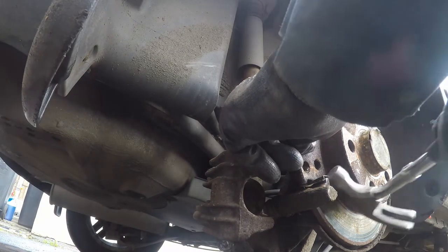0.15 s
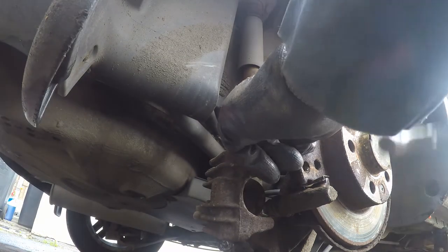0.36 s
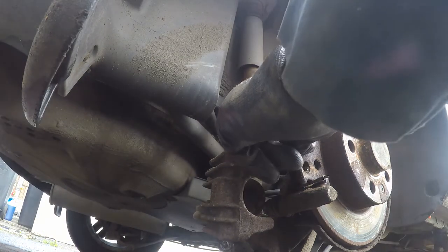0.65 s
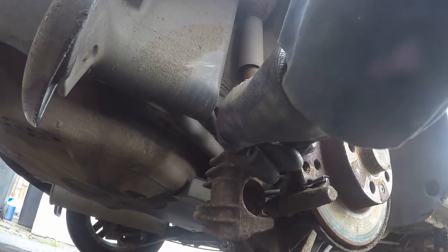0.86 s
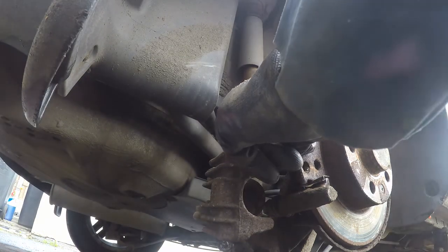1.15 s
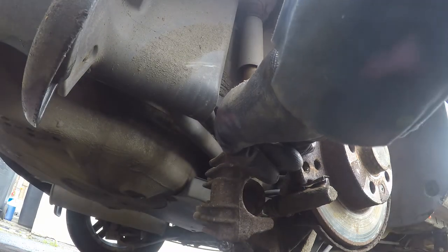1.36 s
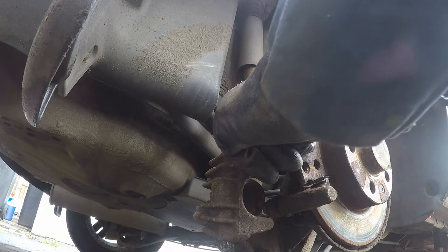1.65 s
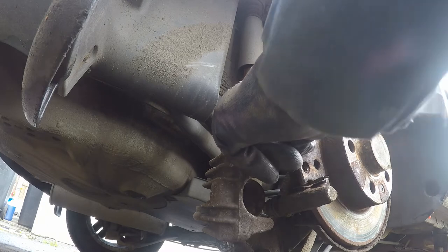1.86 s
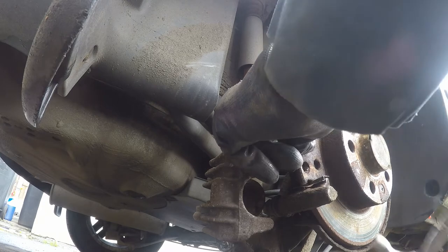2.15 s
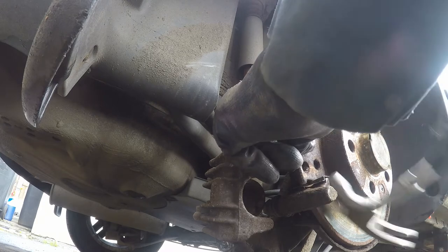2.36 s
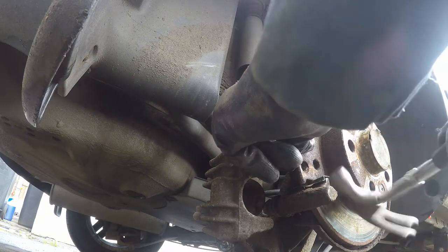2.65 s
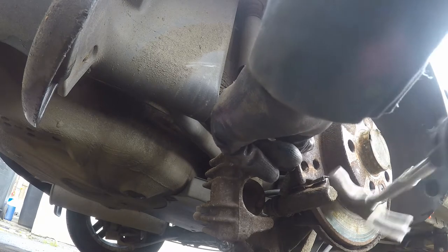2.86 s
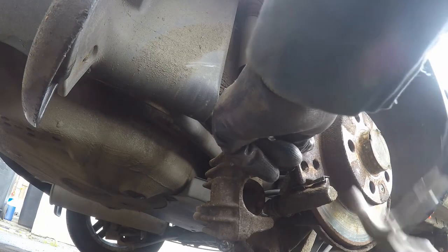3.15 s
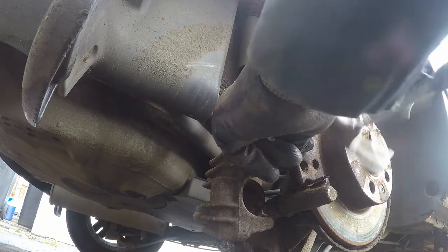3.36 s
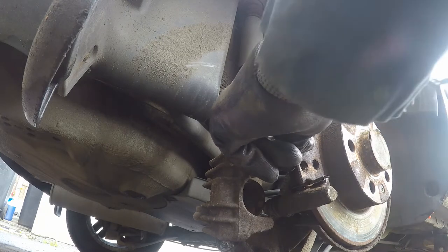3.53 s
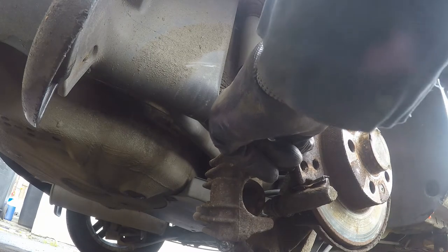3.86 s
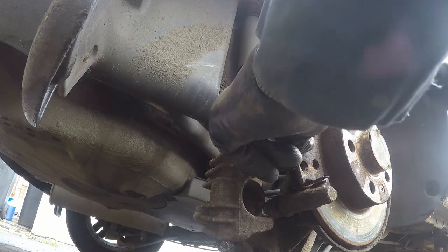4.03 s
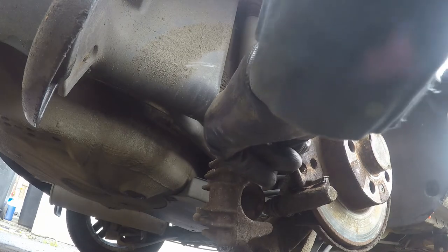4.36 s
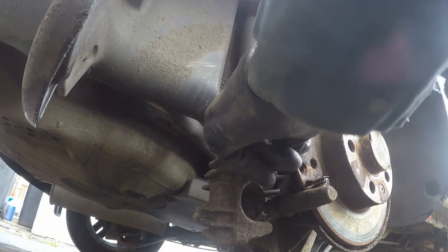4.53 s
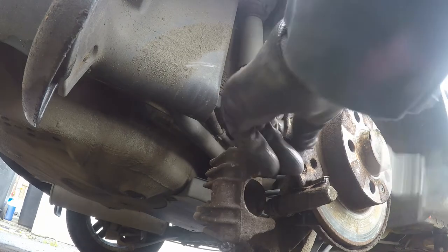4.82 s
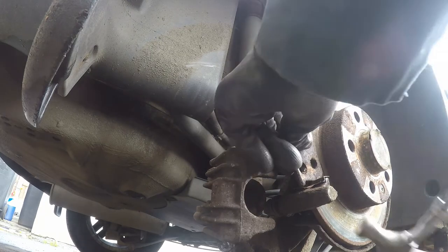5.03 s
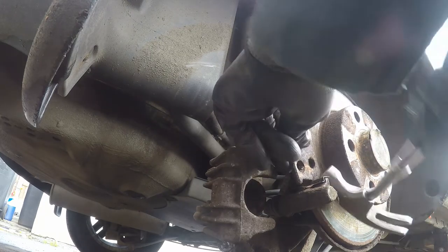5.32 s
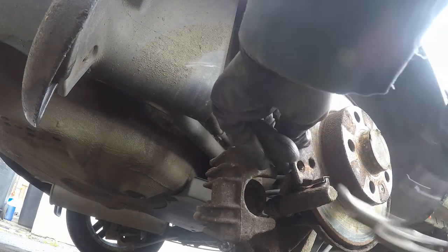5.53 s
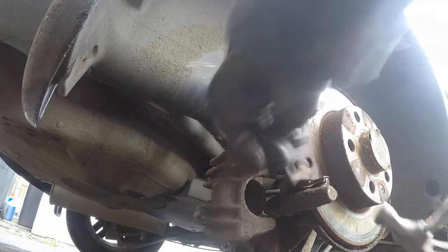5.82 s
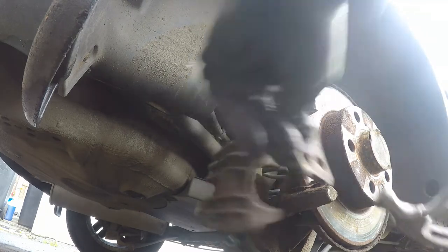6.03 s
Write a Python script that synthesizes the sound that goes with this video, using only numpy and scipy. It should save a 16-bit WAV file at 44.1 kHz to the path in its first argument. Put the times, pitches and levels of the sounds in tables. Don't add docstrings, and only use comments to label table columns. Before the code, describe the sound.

Sharp metallic knocks and short bright rings under a car, with boomy body thuds, small tinkles, low engine hum and swelling road noise.

```python
import sys
import numpy as np
from scipy import signal
from scipy.fft import rfft, irfft
from scipy.io import wavfile
from scipy.ndimage import uniform_filter1d

SR = 44100
rng = np.random.default_rng(int(sys.argv[2]) if len(sys.argv) > 2 else 0)


def gain_from_db(level_db):
    decades = np.asarray(level_db, float) / 20
    return 10 ** decades


def store_wav(level_fs):
    pcm = np.round(np.clip(np.atleast_2d(level_fs), -1, 1) * 32767)
    wavfile.write(sys.argv[1], SR, pcm.T.astype(np.int16))


N = 272979

# frequency [Hz], level [dB].
CASTING_COLOUR = [(240, -42), (450, -14), (570, -20.5), (720, -4), (1480, -1.5), (1880, -10), (2190, -3),
                  (2510, -12), (3050, 3.5), (3720, -7), (4330, -8.5), (5860, -20.5), (8690, -31),
                  (15000, -52.5)]
# level in its family [dB], t60 [s].
DISC_MODES = [(0, .21), (-18, .16), (1, .1), (-17, .25), (2, .125), (-19, .32), (-1, .15), (-28, .4),
              (-2, .16), (-23, .36), (-12, .16)]
DISC_MODE_HZ = [2099, 2540, 3035, 3050, 4281, 4287, 5782, 5789, 7520, 7528, 9473]
MODE_FAMILY = [0, 1, 1, 1, 2, 2, 3, 3, 4, 4, 4]


def evened(x):
    return x / np.sqrt(np.mean(x ** 2) + 1e-20)


def read(points, hz):
    f, value = np.transpose(points)
    return np.interp(np.log(hz + 1), np.log(f + 1), value)


def add(mix, s, sound):
    part = mix[round(s * SR):][:len(sound)]
    part += sound[:len(part)]


def rings(hz, t60, t):
    decay = gain_from_db(-60 * t / np.maximum(t60, .005)[:, None])
    return decay * np.exp(2j * np.pi * hz[:, None] * t)


def blows():
    # start [s], clank [dB],
    # tick re clank [dB], weight below 2 kHz re clank [dB].
    raps = [(0.0854, 4, -7, -21), (0.985, -2, -25, -21.5), (0.9998, -1.5, -19.5, -20.5),
            (1.004, -0.5, -15.5, -20.5), (1.0174, -20, -45, -21), (1.2788, -1, -26.5, -17),
            (1.2823, 4.5, -14.5, -23), (1.5473, -4, -21.5, -15), (1.5561, 2, -6, -14.5),
            (2.2963, 0.5, -38, -10.5), (2.3053, -4, -15, -4), (2.3262, 4, -8.5, -19.5),
            (2.58, -0.5, -17.5, -23), (2.5966, 6, -8.5, -13.5), (2.8268, -2, -18, -21),
            (2.8326, 0, -5.5, -10.5), (3.0411, 1, -19, -25), (3.0472, 1.5, -3.5, -13),
            (3.2696, 0.5, -19, -26.5), (3.2874, -6.5, -14.5, -14.5), (3.9912, 9.5, -12.5, -12.5),
            (4.282, 2, -14.5, -16), (5.2908, 2, -35, -18.5), (5.3062, -9, 12.5, 21),
            (5.5923, 2, -10, -16.5), (5.617, -5, -18, -18), (5.6226, -9, -4, -17), (5.628, -12.5, -18, -14),
            (.1945, -32, -33, -3), (2.6892, -19, -17, -18.5), (2.9153, -17, -24, -23),
                (2.9258, -16, -24, -13), (3.1329, -18, -19, -19), (3.1474, -26.5, -15, -9),
                (3.3154, -16.5, -6, -43), (3.3353, -19, 3, -16), (3.367, -26, -31, -16),
                (4.012, -11.5, -40, -15.5), (4.29, -14, -25, -13), (5.3009, -5, -2, 12),
                (5.4537, -39, -3, -26), (5.471, -39, -14, -22), (6.077, -28, -2, -22),
                (5.8653, -11.5, -27, -13.5), (5.9228, -16, -19, -13), (5.943, -12, -9, -16)]
    # start [s], clank [dB], tick re
    # clank [dB], weight below 2 kHz re clank [dB].
    further_contacts = [(.2, -35, -23, -9), (1.0105, -9, -27.5, -17.5), (2.3185, -30, -3, -25), (2.604, -10, -30, -10),
                        (2.701, -39, -32, 0), (3.276, -7, -24.5, -21), (3.99, -8, -28, -18), (4.2805, -15, -24, -27),
                        (5.79, -39, -15.5, -25), (5.893, -12.5, -24, -12), (5.9157, -18, -30, -10),
                        (5.932, -24, -11, -23), (5.967, -33, -35, 2), (5.8608, -24, -16, -25), (2.056, -46, -28, -8),
                        (3.428, -46, -25, -14)]
    # frequency [Hz], t60 [s].
    casting_t60 = [(400, 0.13), (800, 0.079), (1500, 0.055), (2300, 0.056), (3050, 0.028), (4500, 0.028),
                   (8000, 0.019), (15000, 0.028)]
    mode_count = 420
    t = np.arange(SR // 7) / SR
    dense_hz = (21 + 104 * (np.arange(mode_count) + rng.random(mode_count)) / mode_count) ** 2
    t60_s = read(casting_t60, dense_hz) * np.exp(0.07 * rng.standard_normal(mode_count))
    casting = rings(dense_hz, t60_s, t)
    colour_db = read(CASTING_COLOUR, dense_hz) + 5 * np.log10(dense_hz / 3000)
    bright = np.clip(np.log2(dense_hz / 4000), 0, 1)
    dull = np.clip(np.log2(2300 / dense_hz) * 2, 0, 1)
    attack = 1 - np.exp(-t / 0.00065)
    fade = np.cos(np.pi / 2 * t / t[-1])
    contacts = sorted(raps) + further_contacts
    luck = rng.standard_normal((len(contacts), 2, 430))
    out = np.zeros(N)
    for (s, db, tick_db, weight_db), (a, b) in zip(contacts, luck):
        length = np.clip(1.12 - 0.35 * db - 0.14 * (weight_db + 11.5), .4, 1.6)
        spot = (a + 1j * b)[:mode_count]
        spot = spot / np.sqrt(1 + 0.85 * abs(spot) ** 2)
        mode_db = colour_db + bright * (tick_db + 24.0) + dull * (weight_db + 14.5)
        clank = (gain_from_db(mode_db) * spot @ casting).real
        clank *= attack * fade * gain_from_db(-900 * t * (1 / length - 1))
        add(out, s + 0.00042, gain_from_db(db - 1.0) * clank / abs(clank).max())
        tick = uniform_filter1d(np.diff(a), size=2) * np.exp(-t[:429] / 0.00021)
        add(out, s + 0.00043, gain_from_db(db + tick_db - 12.0) * tick)
    return out


def disc():
    # start [s], rim, hat and face modes [dB], hardness [dB].
    contacts = [(.0857, -30, -25, -31, -8.5), (0.987, -31, -29, -41, -5), (1.0005, -46, -24, -42, -4),
                (1.2815, -42, -16.5, -35, 3.5), (1.548, -18, -27.5, -23.5, -2.5),
                (1.557, -20.5, -20.5, -17.5, -2), (2.2972, -32, -24, -11.5, -13.5),
                (2.327, -42, -9.5, -27, -4), (2.5799, -20, -35, -9.5, -9), (2.596, -33, -24, -24, 5),
                (2.687, -55, -53, -42, -4), (2.8332, -48, -44, -15.5, -7), (2.916, -45, -48, -44, 8),
                (3.0468, -45, -37, -22, 3), (3.2711, -25, -9, -26, -2), (3.991, -17, -16, -20, -1.5),
                (4.0115, -51, -22, -41.5, -2), (4.2818, -20.5, -16, -30, 1),
                (5.2909, -23, -13.5, -19.5, -9), (5.5935, -19.5, -15, -9, -13),
                (5.6232, -18.5, -20.5, -23, -11), (5.757, -55, -57, -47.5, -7), (5.871, -49, -36, -37, -12),
                (5.909, -46, -33, -43, 3), (5.933, -36, -38, -44, -11)]
    # contact [s], extra damping [dB/s], below zero it lifts clear.
    grips = [(.0857, 60), (1.0005, -52), (1.2828, 49), (1.5567, 16), (2.3274, 29), (2.5799, 150),
             (2.596, 63), (2.688, 100), (2.8332, 500), (2.916, 498), (3.0473, 300), (3.2699, 44.5),
             (4.0127, 29.5), (4.2824, 33), (5.2908, -20), (5.6232, -23), (5.757, -100), (5.87, -380),
             (5.909, -50), (5.933, -200)]
    # contact [s], hat pair [s], face pair [s].
    pair_nulls = [(.0857, .06, .075), (1.5567, .045, .078), (2.3274, .055, .048), (4.2824, .062, .024),
                  (5.2908, .06, .062), (5.6232, .05, .09)]
    # contact [s], extra level [dB].
    edge_hits = [(1.2828, 12), (2.596, 4), (4.0127, 16), (4.2824, -3.5), (2.3274, 6), (3.9912, 0),
                 (3.2699, -6)]
    face_overtone_db, rim_overtone_db, null_depth = 0, -8.5, .95
    t, out = np.arange(SR // 2) / SR, np.zeros(N)
    db, t60 = np.transpose(DISC_MODES)
    modes = rings(np.array(DISC_MODE_HZ), t60, t)
    family_turn = rng.random((len(contacts), 5))[:, MODE_FAMILY]
    mode_turn = .08 * rng.random((len(contacts), len(DISC_MODES)))
    phases = np.exp(2j * np.pi * (family_turn + mode_turn))
    following = contacts[1:] + [(N / SR + 1,)]
    for (s, rim_db, hat_db, face_db, hard_db), after, phase in zip(contacts, following, phases):
        family_db = [rim_db, hat_db, face_db,
                     face_db + face_overtone_db + hard_db, rim_db + rim_overtone_db + hard_db]
        family_db[-1] += sum(extra_db for at, extra_db in edge_hits if abs(at - s) < .006)
        grip = sum(loss for at, loss in grips if abs(at - s) < .006)
        choke = uniform_filter1d(np.where(t > after[0] - s, gain_from_db(-26), 1), 60)
        choke = choke * (1 - np.exp(-t / 0.00017))
        strength = gain_from_db(db + np.array(family_db)[MODE_FAMILY]) * phase
        for at, *nulls in pair_nulls:
            if abs(at - s) >= .006:
                continue
            for main, null_s in zip((2, 4), nulls):
                k = round(null_s * SR)
                strength[main + 1] = -null_depth * strength[main] * modes[main, k] / modes[main + 1, k]
        add(out, s, (strength @ modes).imag * choke * gain_from_db(-grip * np.minimum(t, .12)))
    return out


def tinkles():
    # start [s], peak [dB], frequency [Hz], t60 [s].
    small_parts = [(3.274, -21, 7500, 0.057), (3.3165, -26, 11900, 0.027), (3.337, -32, 11300, 0.022),
                   (3.3685, -29, 4800, 0.015), (3.995, -30, 11620, 0.043), (4.285, -34.5, 11500, .063),
                   (5.307, -15, 10340, 0.02), (5.307, -26, 7830, 0.03), (5.308, -11, 11400, 0.012),
                   (5.393, -54, 11200, .025), (5.454, -46, 7600, 0.034), (5.47, -33, 4630, 0.013),
                   (5.756, -54, 9290, .03), (5.781, -51, 9000, 0.027), (5.876, -35, 10940, .02),
                   (5.889, -34, 12000, 0.017), (5.896, -27, 12100, 0.014), (5.944, -13, 8800, 0.0063),
                   (6.077, -34, 4830, 0.019), (6.078, -28, 7900, 0.026)]
    # start [s], peak
    # [dB], frequency [Hz], t60 [s].
    clangs = [(0.091, -21, 2500, 0.12), (.09, -27.5, 2190, 0.18), (.0865, -13, 4320, .028),
              (2.6888, -35, 3230, .02), (2.688, -33, 4500, .02), (2.917, -23, 3250, 0.027),
              (2.836, -34, 2540, 0.25), (3.1346, -33.5, 3300, .025), (0.997, -17, 140, 0.049),
              (1.0, -24, 358, 0.19), (1.28, -17, 143, 0.1), (1.285, -32, 358, 0.14),
              (2.298, -7.5, 3124, 0.034), (2.327, -6, 1497, 0.034), (3.99, -14.5, 205, .12),
              (5.943, -21, 7600, 0.014), (5.966, -25, 950, .02), (0.0907, -15, 1580, 0.049),
              (1.003, -4.5, 2150, 0.04), (1.005, -16.5, 5730, 0.043), (1.56, -8, 2180, 0.052),
              (2.308, -10, 3080, 0.023), (2.327, -27, 7550, 0.076), (2.836, -12.5, 1527, 0.067),
              (3.2691, -4, 4830, 0.019), (3.993, -5, 2255, 0.041), (4.012, -16.5, 2980, 0.024),
              (4.2819, -4.5, 3036, 0.084), (4.287, -10, 790, 0.055), (5.2896, -1.5, 3040, 0.028),
              (5.298, -20, 920, 0.044), (5.315, -10.5, 806, 0.049), (5.595, -2, 3035, 0.045),
              (5.867, -21.5, 1440, 0.073), (5.8665, -17.5, 3220, 0.037), (5.932, -28.5, 3047, 0.17),
              (5.943, -15.5, 4080, 0.034), (6.092, -19.5, 250, 0.096)]
    # start [s], peak [dB].
    pin = [(.195, -67), (2.33, -43), (2.715, -64), (2.93, -62), (3.15, -69), (3.3685, -55), (5.454, -56)]
    pin_hz, pin_t60_s = 12800, 0.05
    t, out = np.arange(SR // 8) / SR, np.zeros(N)
    parts = small_parts + clangs + [(s, db, pin_hz, pin_t60_s) for s, db in pin]
    luck = rng.standard_normal((len(parts), 400))
    for (s, db, hz, t60), grit in zip(parts, luck):
        spread_hz = 0.53 / t60 * np.array([0, 3, -4]) * (1 + 0.83 * grit[:3])
        cluster = rings(hz + spread_hz, t60 * np.array([1, .6, .6]), t)
        note = (np.array([1, .55, .55]) @ cluster).imag * (1 - np.exp(-t / 0.0017))
        add(out, s, gain_from_db(db) * note)
        tick = uniform_filter1d(np.diff(grit), 3) * np.exp(-t[:399] / 0.0023)
        add(out, s, gain_from_db(db - 17.0) * tick)
    return out


def drag():
    # time [s], pressure [dB].
    strokes = [
        [(5.75, -74), (5.76, -63), (5.795, -48), (5.81, -58)],
        [(5.857, -41), (5.868, -27), (5.9, -35), (5.925, -42), (5.953, -59)],
    ]
    t, pressure = np.arange(N) / SR, np.zeros(N)
    for stroke in strokes:
        s, db = np.transpose(stroke)
        pressure += gain_from_db(np.interp(t, s, db, -200, -200))
    size = gain_from_db(3.5 * np.minimum(rng.exponential(1, N), 3))
    slips = pressure * size * rng.choice([-1, 1], N) * (rng.random(N) < 700 / SR)
    db, t60 = np.transpose(DISC_MODES)
    mode_db = db + np.array([-16, -4, 1, -22, -6])[MODE_FAMILY]
    ring = (gain_from_db(mode_db) @ rings(np.array(DISC_MODE_HZ), 0.59 * t60, t[:8000])).imag
    hz = np.fft.rfftfreq(2048, 1 / SR)
    burst = rng.standard_normal(2048) * np.exp(-t[:2048] / 0.0035)
    grit = irfft(rfft(burst) * gain_from_db(0.41 * read(CASTING_COLOUR, hz)))
    ringing = signal.oaconvolve(slips, gain_from_db(-20) * ring)[:N]
    clanking = signal.oaconvolve(slips, grit / abs(grit).max())[:N]
    return ringing + clanking * gain_from_db(-7.0)


def arch(x):
    # frequency [Hz], t60 [s].
    echo_t60 = [(200, 0.51), (1000, 0.11), (4000, 0.094), (14000, 0.09)]
    taps = np.zeros(SR // 2)
    at = np.arange(80, SR // 2 - 20, 20)
    taps[at + rng.integers(0, 20, len(at))] = rng.choice([-1., 1.], len(at))
    hz, t, z = signal.stft(taps, SR, nperseg=128)
    tail = signal.istft(z * gain_from_db(-60 * t / read(echo_t60, hz)[:, None]), SR, nperseg=128)[1]
    return signal.fftconvolve(x, tail / np.linalg.norm(tail))[:N]


def body():
    # start [s], floor pan [dB], near panel [dB], frame [dB].
    shoves = [(0.0844, -17, -8.5, -18.5), (.742, -24.5, -19.5, -29), (.983, -23, -19, -14),
              (.996, -8.5, -8.5, -4), (1.277, -6.5, -6, -2), (1.553, -13, -5.5, -8.5),
              (2.296, -18, -4.5, -13), (2.3248, -25, -7.5, -8), (2.586, -12.5, -6.5, -14.5),
              (2.83, -20, -6, -14.5), (3.043, -20, -6.5, -25), (3.274, -11.5, -13, -12),
              (3.986, -8.5, -5, -9), (4.2825, -15, -12, -6.5), (5.291, -27, -9, -18.5),
              (5.591, -17, -6.5, -17), (5.867, -14.5, -32, -33), (6.087, -31, -16, -12.5)]
    mode_hz = [110, 143, 194, 238, 358]
    mode_t60 = [0.26, 0.19, 0.22, 0.24, 0.26]
    frame_usual_db, frame_follows = [-18, -23, -26], [0.72, 0.28, 0.66]
    thud_db, thud_t60_s = -22.5, 0.14
    t, out = np.arange(SR // 3) / SR, np.zeros(N)
    rise = (1 - np.exp(-t / 0.0099)) ** 2
    modes = rings(np.array(mode_hz), np.array(mode_t60), t).imag * rise
    small = rings(np.geomspace(90, 480, 24), np.full(24, thud_t60_s), t) * rise
    luck = rng.standard_normal((len(shoves), 2, 24))
    for (s, pan_db, panel_db, frame_db), (a, b) in zip(shoves, luck):
        bent_db = frame_usual_db + (frame_db - frame_usual_db[0]) * np.array(frame_follows)
        mode_db = np.array([pan_db, panel_db, *bent_db])
        boom = gain_from_db(mode_db - 2.0) @ modes
        thud = gain_from_db(thud_db + np.mean(mode_db) + 9.5) * ((a + 1j * b) @ small).real
        add(out, s, boom + thud)
    return out


def rustle():
    # start [s], length [s], level [dB].
    strokes = [(0.268, 0.14, -60), (0.42, 0.29, -57), (0.61, 0.26, -64), (1.767, 0.14, -57.5),
               (3.55, 0.2, -59), (4.537, 0.49, -56.5), (5.727, 0.075, -56)]
    # frequency [Hz], level [dB].
    cloth = [(800, -6), (2500, 6), (3500, 6), (7000, -6.5), (12000, -13.5), (15500, -21.5)]
    stroke = np.full(N, gain_from_db(-66))
    for s, length, db in strokes:
        add(stroke, s, gain_from_db(db) * signal.windows.tukey(round(length * SR), .9))
    grain_db = 1.2 * evened(uniform_filter1d(rng.standard_normal(N), 200))
    fibres = rng.standard_normal(N) * gain_from_db(grain_db)
    colour = gain_from_db(read(cloth, np.fft.rfftfreq(N, 1 / SR)))
    return stroke * evened(irfft(rfft(fibres) * colour, N))


def drift(top_hz):
    t = np.arange(0, N + 256, 256) / SR
    slow = sum(np.sin(2 * np.pi * (f * t + rng.random())) / np.sqrt(f) for f in np.geomspace(.3, top_hz, 20))
    return np.interp(np.arange(N) / SR, t, evened(slow))


def traffic():
    # time [s], tyre roar [dB].
    roar_points = [(0, -56.5), (.35, -56), (.9, -45), (1.5, -47), (2.25, -37), (2.9, -33), (3.4, -39),
                   (3.95, -34.5), (4.7, -31.5), (5.2, -30.5), (5.75, -37), (5.95, -26.5), (6.19, -25.5)]
    # time [s], drone [dB].
    engine_points = [(0, -27.5), (.45, -32.5), (.85, -25), (1.6, -27.5), (2.55, -24), (2.8, -38.5),
                     (3.2, -31), (3.95, -31.5), (4.5, -38.5), (5.1, -32), (6.19, -28)]
    # frequency [Hz], level [dB per Hz].
    outside = [(16, -17.5), (30, -7.5), (52, -5.5), (75, -11.5), (104, -6.5), (210, -11.5), (330, -14),
               (560, -27.5), (760, -24.5), (1020, -21.5), (1150, -27), (3000, -42), (13500, -73.5),
               (16000, -83)]
    # low edge [Hz], high edge [Hz].
    bands = [(35, 70), (85, 420), (600, 1800), (3200, 9000)]
    # time [s], passing time [s], frequency [Hz], level [dB].
    passes = [(1.2, 0.26, 296, 6.5), (2.05, 0.56, 635, 9.5), (3.3, 0.41, 597, 6.5), (3.79, 0.38, 104, 7),
              (4.15, .15, 760, -1.5), (4.6, 0.25, 2840, 5.5), (6.1, 0.22, 200, -2)]
    # time [s], loss [dB].
    ducks = [(1.004, -4), (1.284, 4.5), (1.555, 9), (2.325, 12.5), (2.596, 14.5), (3.991, 16.5),
             (4.283, 22), (5.594, 3)]
    recover_s = 0.34
    near_db, rumble_db, rumble_follows, rumble_rise_db_per_s = -33, -29, 0.46, 1.5
    hiss_db, hiss_follows = -54.5, 1
    drone_hz, drift_top_hz, waver_hz, sag_hz = 51, 4, .9, 3.5
    drone_db, under_db = 1.5, -5
    rough_from_s, rough_tone_db, rough_noise_db, smooth_noise_db = 2.7, -1.5, 2, -3

    frames, hz = N // 512 + 5, np.fft.rfftfreq(2048, 1 / SR)
    a, b, patches = rng.standard_normal((frames, 1025, 3)).T
    patches = evened(uniform_filter1d(uniform_filter1d(patches, 16, 0), 6, 1))
    colour_db = read(outside, hz)
    t = np.arange(frames) * 512 / SR
    ducked_db = np.max([db * np.exp(-abs(t - s) / recover_s) * (t > s) for s, db in ducks], axis=0)
    roar_db = np.interp(t, *np.transpose(roar_points)) - ducked_db
    engine_db = np.interp(t, *np.transpose(engine_points))
    nearness_db = roar_db - near_db
    street_db = rumble_db + rumble_follows * nearness_db + rumble_rise_db_per_s * (t - t[-1])
    levels = [engine_db, street_db, roar_db, hiss_db + hiss_follows * nearness_db]

    lifts = []
    for db, (lo, hi) in zip(levels, bands):
        plain_power = (gain_from_db(colour_db[(hz > lo) & (hz < hi)]) ** 2).sum()
        lifts.append(db - 10 * np.log10(plain_power))
    lifts = np.array(lifts)
    lumpy = np.clip((t - rough_from_s) / .2, 0, 1)
    lifts[0] += under_db + smooth_noise_db + (rough_noise_db - smooth_noise_db) * lumpy
    edges_hz = np.ravel(bands)
    shares = np.array([read(list(zip(edges_hz, np.repeat(row, 2))), hz) for row in np.eye(len(bands))])

    passes_db = 0
    for s, length, top_hz, db in passes:
        tint = np.exp(-(np.log2(hz / top_hz + 0.0011) / .5) ** 2)
        passes_db = passes_db + db * np.outer(tint, np.exp(-((t - s) / length) ** 2))
    z = (a + 1j * b) * gain_from_db(passes_db + colour_db[:, None] + shares.T @ lifts + 1.6 * patches)
    wash = gain_from_db(1.5) * signal.istft(z, nperseg=2048, noverlap=1536)[1][:N]

    waver, swell = drift(drift_top_hz), drift(drift_top_hz)
    fine_t = np.arange(N) / SR
    pitch_hz = drone_hz - sag_hz * np.interp(fine_t, t, lumpy) + waver_hz * waver
    drone = np.sin(2 * np.pi * np.cumsum(pitch_hz) / SR) * gain_from_db(4.2 * swell)
    tone_db = np.interp(fine_t, t, engine_db + rough_tone_db * lumpy) + drone_db
    return wash + drone * gain_from_db(tone_db)


def scene():
    ring = disc()
    metal = blows() + tinkles() + drag()
    echo = gain_from_db(-9.5) * arch(metal + .4 * ring)
    return (metal + ring + echo + body() + rustle() + traffic())[None]


def band_limit(x):
    return signal.sosfilt(signal.butter(12, 16500, fs=SR, output="sos"), x)


def record(dry):
    knee, ceiling, edge_hz = .6, .91, 15400
    room = ceiling - knee
    over = np.maximum(abs(dry) - knee, 0)
    squeezed = np.sign(dry) * (np.minimum(abs(dry), knee) + room * np.tanh(over / room))
    smooth = signal.oaconvolve(squeezed, signal.firwin(91, edge_hz, fs=SR)[None], "same")
    return band_limit(smooth)


dry = scene()
out = record(dry)
store_wav(out)
```